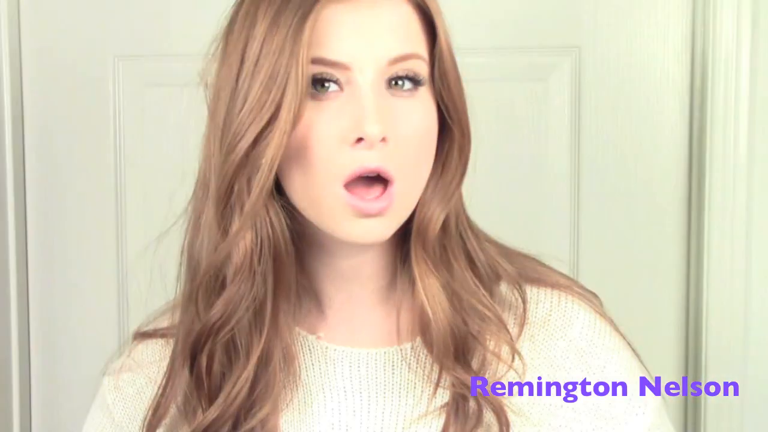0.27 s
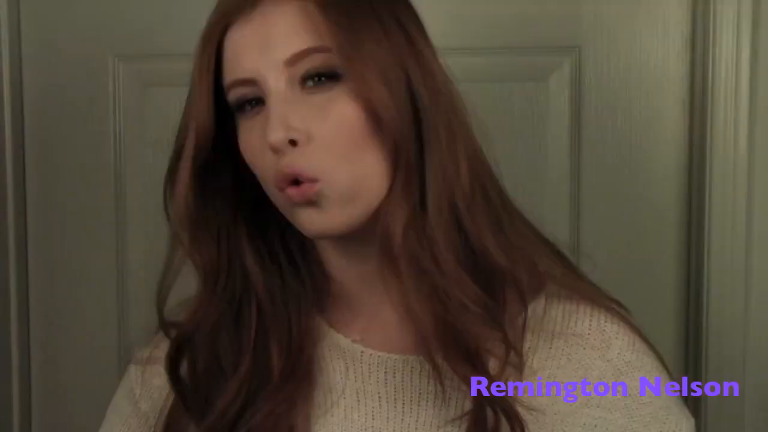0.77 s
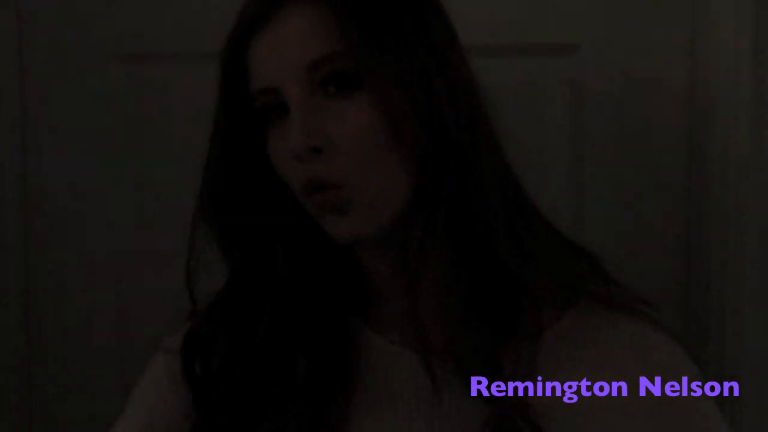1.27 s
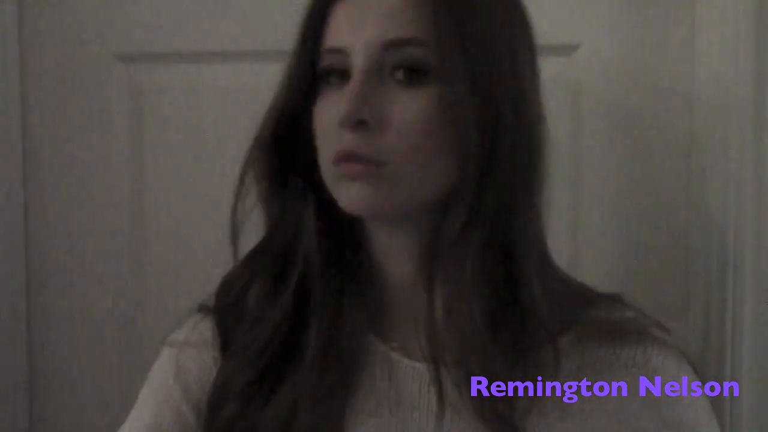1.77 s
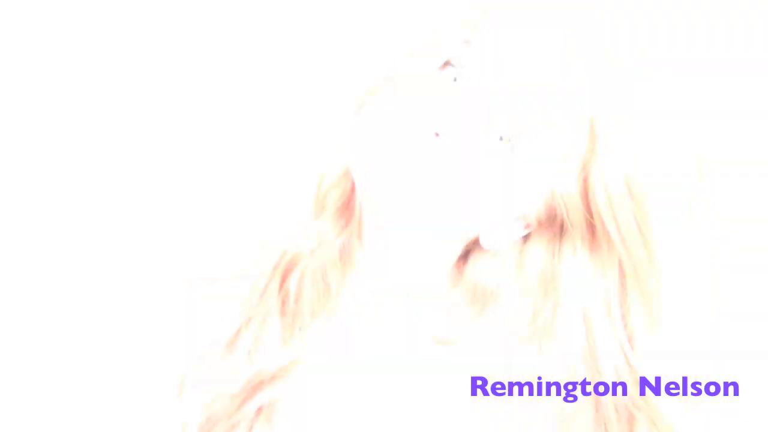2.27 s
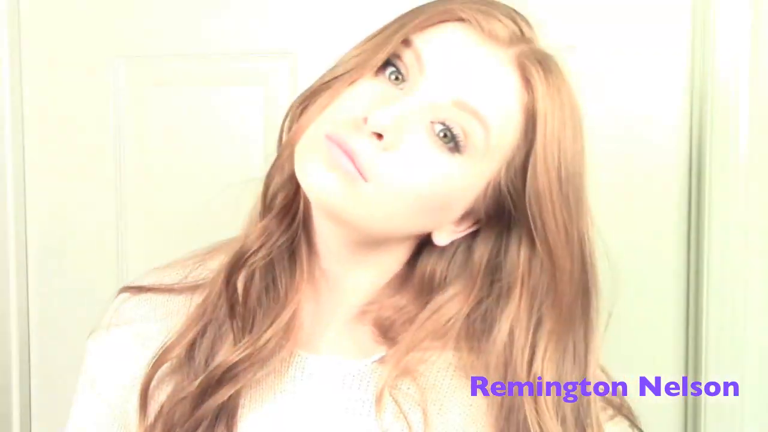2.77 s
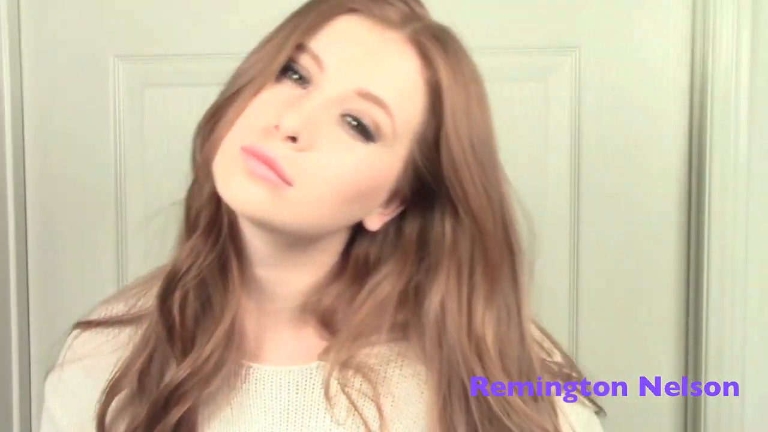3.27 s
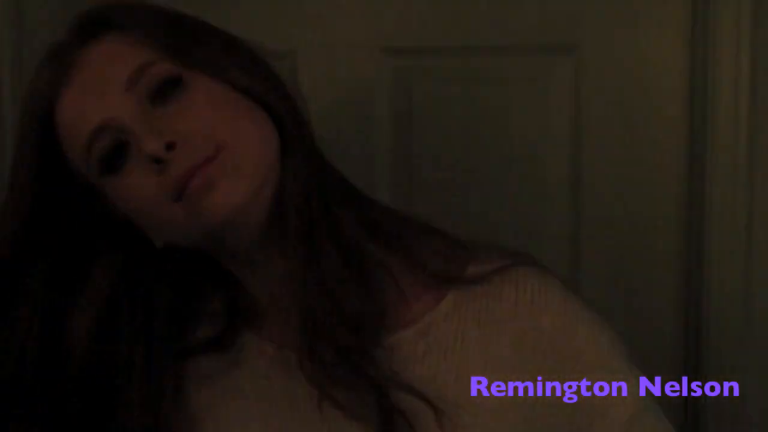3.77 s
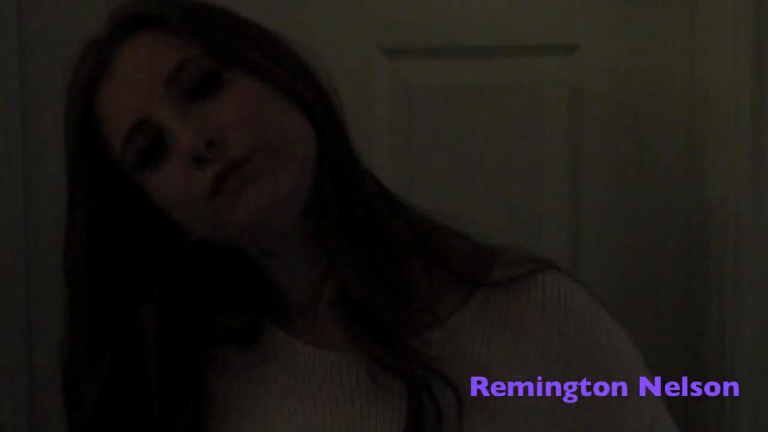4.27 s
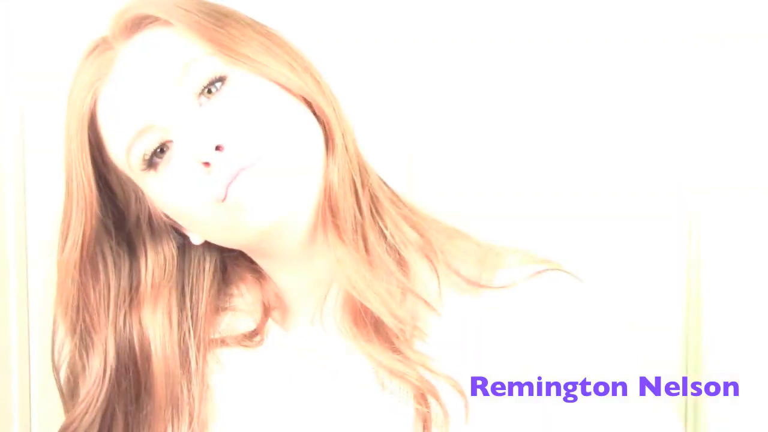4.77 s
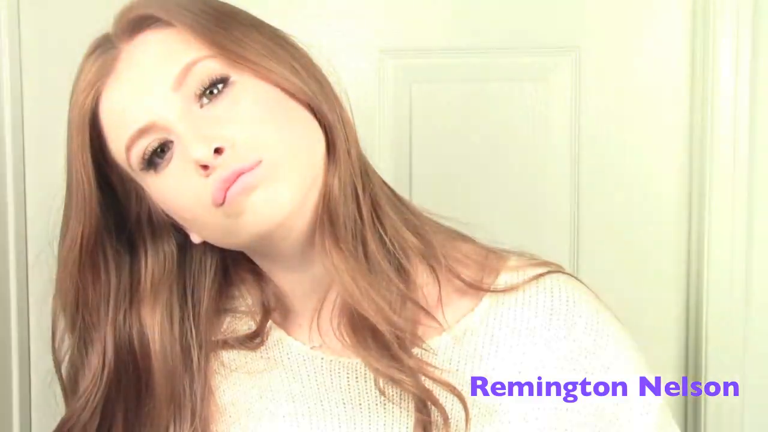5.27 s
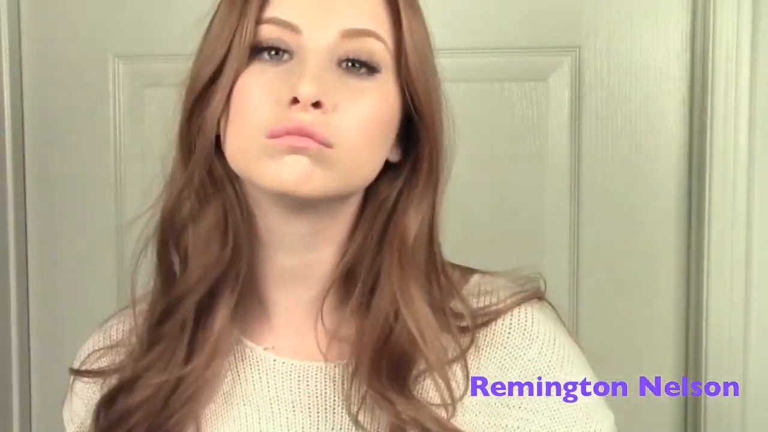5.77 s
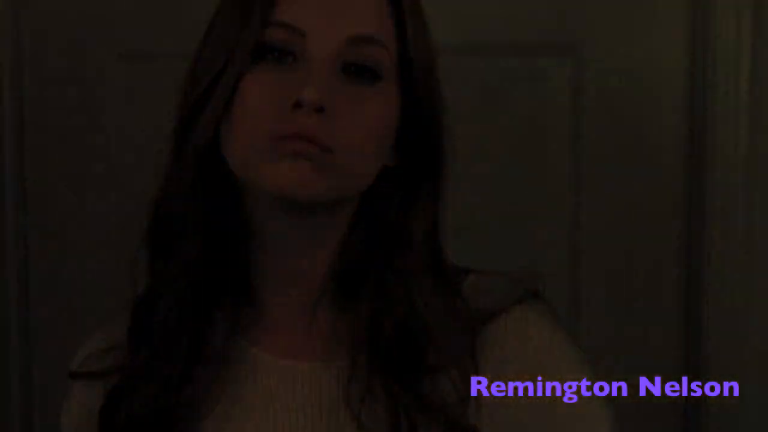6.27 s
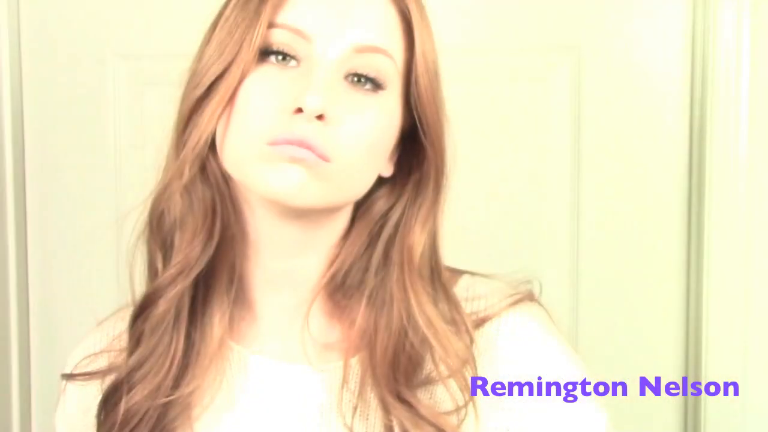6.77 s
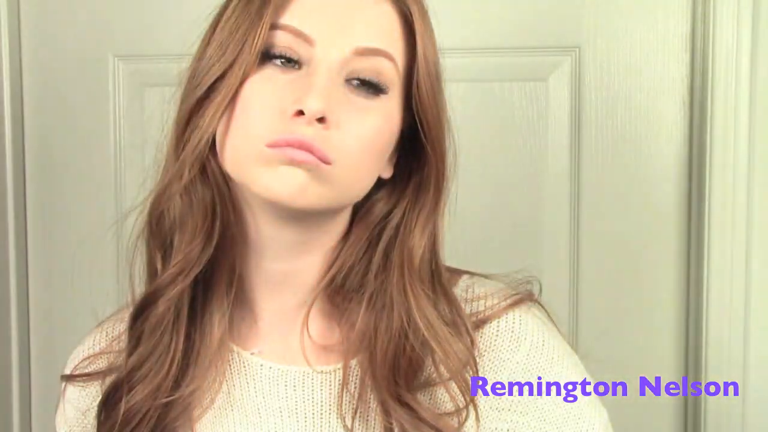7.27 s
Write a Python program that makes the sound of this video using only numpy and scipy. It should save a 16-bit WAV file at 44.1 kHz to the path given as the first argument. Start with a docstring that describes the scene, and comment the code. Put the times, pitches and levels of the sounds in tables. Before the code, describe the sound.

A light switch clicks sharply off and on three times in a small echoing room, over a low ventilation hum.

```python
"""A small, hard-walled room, with a stereo microphone close to a wall switch.
Over ventilation rumble, hum and a rattling fan, the switch is flicked off and on three times.
Each flick is a snap of the contacts, a rebound or two and the lever hitting its stop; the room rings on.
Between flicks come faint ticks and the soft taps of someone shifting about.
A limiter ducks the snaps and lets the echo swell back."""
import sys
import numpy as np
from scipy import signal
from scipy.fft import rfft, irfft, next_fast_len
from scipy.io import wavfile
from scipy.ndimage import uniform_filter1d, minimum_filter1d

SR = 44100
rng = np.random.default_rng(int(sys.argv[2]) if len(sys.argv) > 2 else 0)


def persist_wave(psi):
    """Save psi, clipped to +-1, as 16-bit WAV."""
    counts = np.round(np.clip(psi, -1, 1) * 32767).astype(np.int16)
    wavfile.write(sys.argv[1], SR, np.atleast_2d(counts).T)


N = 331609

# ventilation at the microphone, mid and side: (frequency [Hz], relative level [dB])
VENT_MID = [(12, -42.5), (20, -12), (74, 0), (123, -3), (145, -1.5), (240, -4), (268, -9.5), (355, -10.5),
            (397, -16), (554, -19), (1210, -27), (1690, -26.5), (2800, -30.5), (7230, -36), (15800, -44.5)]
VENT_SIDE = [(12, -42), (20, -1.5), (149, -1), (355, -5.5), (1210, -19), (1690, -18.5), (1950, -23.5),
             (4020, -29), (11000, -37), (14100, -38.5), (15800, -54)]
# tones of the hum: (frequency [Hz], rms level [dB])
HUM_TONES = [(86.5, -60), (120, -51.5), (206, -59), (360, -65.5)]
# colour of the fan's rattle: (frequency [Hz], relative level [dB])
FAN_COLOUR = [(900, -19), (1450, -8.5), (1750, 0), (2200, -14), (3000, -19), (6000, -26)]
# snaps of the contacts, the last three columns relative to the level:
# (time [s], level [dB], brightness [dB/octave], plate thud [dB], spring ring [dB], blade ring [dB])
OFF_SNAPS = [(.8107, 16.5, 1.7, -18.5, -16.5, -25), (3.6040, 22.5, 2.5, -24, -11, -24),
             (6.0574, 15, 2, -35, -16.5, -20)]
ON_SNAPS = [(2.0188, 17.4, 1.2, -12.5, -11, -36), (4.5259, 18.6, -1.16, -16, -10.5, -13),
            (6.5482, 18.7, -0.38, -14, -9, -13.5)]
# the lever hitting its stop: (time [s], level [dB])
OFF_LEVER_STOPS = [(0.8147, 23.5), (3.6376, 17), (6.0681, 21.5)]
ON_LEVER_STOPS = [(2.0417, 12.5), (4.5545, 8.7), (6.5875, 10.5)]
# shared by all flicks one way: (snap rattle [ms], stop rattle [ms], lever ring [dB], stop thud change [dB])
OFF_ACTION = (0.62, 0.77, -26, -12.5)
ON_ACTION = (0.52, 2.2, -17.5, -3.5)
# colour of the plastic housing, each way, and of the wall plate: (frequency [Hz], relative level [dB])
OFF_HOUSING = [(150, -21), (600, -25), (1800, -15), (2400, -9), (3300, -4), (3950, -0.5), (4700, -7.5),
               (5500, -8.5), (6700, 1), (7600, -2), (8800, -10.5), (11000, -16.5), (14500, -21),
               (16500, -50.5)]
ON_HOUSING = [(150, -58), (500, -34.5), (950, -10), (1800, -10), (2500, 7.5), (2900, -2.5), (4200, 2.5),
              (5200, 0.5), (6600, 3.5), (8100, 3), (9600, -5.5), (12000, -5.5), (14500, -10),
              (16500, -47.5)]
WALL_PLATE = [(100, 0.5), (300, -7.5), (520, -13), (700, 4), (940, 1.5), (1200, 7.5), (1500, 9),
              (2000, -0.5), (3000, -10.5), (8000, -50.5)]
# ringing of the spring, contact blade and lever: (frequency [Hz], T60 [s])
PART_RINGS = [(2470, 0.046), (4090, 0.083), (6650, .012)]
# decay of the room's tail: (frequency [Hz], T60 [s])
TAIL_T60 = [(200, 0.67), (800, 0.55), (2000, 0.51), (4000, 0.52), (7000, 0.45), (10000, 0.38),
            (15000, 0.23)]
# colour of that tail: (frequency [Hz], relative level [dB])
TAIL_COLOUR = [(200, -14.5), (800, 1.5), (2000, 1), (4000, 4), (7000, -1.5), (10000, 1), (15000, 4)]
# stereo width at the microphone: (frequency [Hz], side gain [dB])
SIDE_GAIN = [(200, -14), (600, -15), (1400, -35), (2400, -57.5), (4400, -15), (8000, -12), (15000, -12)]
# tiny ticks, and soft taps of someone shifting about: (time [s], level [dB], rattle [ms])
TINY_TICKS = [(1.593, -32, 4.6), (3.080, -31.5, 2.5), (4.100, -30, 5), (4.2259, -27.5, 1.2)]
SOFT_TAPS = [(3.170, -15, 15), (3.190, -20, 26), (3.348, -28.5, 19), (4.058, -23, 35), (4.094, -26.5, 9.2)]
# their colours: (frequency [Hz], relative level [dB])
TICK_SPECTRUM = [(1000, -18), (4500, -10), (5300, 0), (6600, -5), (8000, -11), (9500, -11), (11000, -18),
                 (16000, -21)]
TAP_SPECTRUM = [(300, -6), (800, -18), (1220, 3), (1500, -6), (1950, 4.5), (2600, -9.5), (3300, -3.5),
                (4400, -33.5), (5250, -5), (6000, -26), (7000, -17), (10000, -33.5), (16000, -30)]


def amp(db):
    return 10 ** (np.asarray(db) / 20)


def unit_rms(x):
    return x / np.sqrt(np.mean(x ** 2) + 1e-20)


def unit_energy(x):
    return x / (np.linalg.norm(x) + 1e-12)


def curve_at(points, hz):
    """Joins the points of a spectrum on a log-frequency axis."""
    point_hz, values = np.transpose(points)
    return np.interp(np.log(hz + 1), np.log(point_hz + 1), values)


def add(mix, start_s, sound):
    """Lays a sound into the mix."""
    part = mix[round(start_s * SR):][:len(sound)]
    part += sound[:len(part)]


def shaped(x, points):
    """Equalises a long sound without shifting its phase."""
    size = next_fast_len(N)
    gain = amp(curve_at(points, np.fft.rfftfreq(size, 1 / SR)))
    return irfft(rfft(x, size) * gain, size)[:N]


def coloured(x, points, size=4096):
    """Causal filter with the given spectrum: nothing sounds before the blow."""
    log_gain = np.log(amp(curve_at(points, abs(np.fft.fftfreq(size, 1 / SR)))))
    minimum_phase = np.exp(np.conj(signal.hilbert(log_gain)))
    return signal.fftconvolve(x, np.fft.ifft(minimum_phase).real[:size // 2])


def noise(points):
    """Steady noise of rms one with the given spectrum."""
    return unit_rms(shaped(rng.standard_normal(N), points))


def ventilation(mains_hz=60, shaft_hz=26.7, jolt_s=0.0068, hum_waver_rad=0.26, shaft_waver_rad=0.58):
    """Room tone, mid and side: rumble and hiss of the air, a wavering hum and a fan's faint rattle."""
    t = np.arange(N) / SR
    drift = [(1, 0), (3, -6), (10, -40), (40, -120)]  # (frequency [Hz], relative level [dB])
    hum = sum(amp(db) * np.sqrt(2) * np.sin(2 * np.pi * hz * t + hum_waver_rad * noise(drift))
              for hz, db in HUM_TONES)
    # each mains cycle jolts the motor, but it only rattles during one half of the shaft's turn
    jolts = np.exp(-(t % (1 / mains_hz)) / jolt_s)
    contact = np.maximum(np.sin(2 * np.pi * shaft_hz * t + shaft_waver_rad * noise(drift)), 0)
    fan = amp(-66) * unit_rms(shaped(rng.standard_normal(N) * jolts * contact, FAN_COLOUR))
    return np.array([amp(-45) * noise(VENT_MID) + hum + fan, amp(-53) * noise(VENT_SIDE)])


def flicks(snaps, stops, action, rebounds, gap_s=0.0014, rebound_db=-2.5):
    """Lists the impacts: the contacts snap and rebound, then the lever hits its stop, a little duller."""
    snap_ms, stop_ms, lever_db, stop_thud_db = action
    impacts = []
    for (snap_s, db, tilt, thud_db, spring_db, blade_db), (stop_s, stop_db) in zip(snaps, stops):
        for k in range(rebounds + 1):
            impacts.append((snap_s + k * gap_s, db + k * rebound_db, snap_ms, tilt, thud_db,
                            spring_db, blade_db, lever_db))
        impacts.append((stop_s, stop_db, stop_ms, tilt - 1, thud_db + stop_thud_db,
                        spring_db - 2.5, blade_db, lever_db))
    return impacts


def rattle(decay_ms, size=4096):
    """Surfaces chatter as they meet: a dying burst of force, spread fairly evenly over all pitches."""
    fade = np.exp(-np.arange(size) / SR * 1000 / decay_ms)
    burst = rng.standard_normal(size) * fade
    for _ in range(2):
        whitened = irfft(np.exp(1j * np.angle(rfft(burst))))
        burst = whitened * fade ** 0.25
    return unit_energy(burst)


def switch(impacts, housing, slide_db=-20, slide_s=0.006):
    """After a brief slide of the lever, each impact sounds the housing, wall plate and small parts."""
    out = np.zeros(N)
    t = np.arange(SR // 6) / SR
    rings = [amp(-60 * t / t60) * np.sin(2 * np.pi * hz * t) for hz, t60 in PART_RINGS]
    for hit_s, db, rattle_ms, tilt, thud_db, *ring_dbs in impacts:
        force = rattle(rattle_ms)
        tilted_housing = [(hz, level + tilt * np.log2(hz)) for hz, level in housing]
        add(out, hit_s, amp(db) * unit_energy(coloured(force, tilted_housing)))
        add(out, hit_s, amp(db + thud_db) * unit_energy(coloured(force, WALL_PLATE)))
        for ring, ring_db in zip(rings, ring_dbs):
            add(out, hit_s, amp(db + ring_db) * unit_energy(signal.fftconvolve(force, ring)))
        slide = rng.standard_normal(len(t)) * (t < slide_s) * t ** 2  # the lever gathers speed
        add(out, hit_s - slide_s, amp(db + slide_db) * unit_energy(coloured(slide, housing)))
    return out


def room_tail():
    """Dense reflections between the hard walls, each band dying at its own speed."""
    hz, t, bands = signal.stft(rng.standard_normal(SR), SR, nperseg=256)
    decay = amp(-60 * t / curve_at(TAIL_T60, hz)[:, None])
    tail = signal.istft(bands * decay, SR, nperseg=256)[1][:SR]
    return unit_energy(coloured(tail, TAIL_COLOUR)[:SR])


def room(beams, near_db=-6.5, near_t60_s=0.07, near_gap_s=0.00063, tail_db=-10, tail_rise_s=0.0081):
    """Mid and side: one beam reaches the microphone directly; all return off near walls and as a tail."""
    t = np.arange(SR) / SR
    near_envelope = amp(-60 * t / near_t60_s) * (t > near_gap_s)
    tail_rise = np.minimum(t / tail_rise_s, 1)
    direct = beams[0]
    mid, side = np.zeros((2, N))
    for beam in beams:
        for channel in (mid, side):
            near = unit_energy(rng.standard_normal(SR) * near_envelope)
            response = amp(near_db) * near + amp(tail_db) * room_tail() * tail_rise
            add(channel, 0, signal.oaconvolve(beam, response) / np.sqrt(len(beams)))
    # a slight lag between the microphone's ports puts direct sound into the side, a quarter cycle turned
    turned = -signal.hilbert(direct, next_fast_len(N)).imag[:N]
    return np.array([direct + mid, shaped(side + amp(-2) * turned, SIDE_GAIN)])


def touches(hits, colour):
    """Ticks and taps: surfaces meet lightly, without ringing."""
    out = np.zeros(N)
    for hit_s, db, rattle_ms in hits:
        add(out, hit_s, amp(db) * unit_energy(coloured(rattle(rattle_ms), colour)))
    return out


def stereo(mid_side, balance_db=0):
    """Decodes mid and side to left and right; a negative balance leans right."""
    mid, side = mid_side
    return np.array([(mid + side) * amp(balance_db / 2), (mid - side) * amp(-balance_db / 2)])


def scene():
    """The close switch and the faint touches sound through the room, over the ventilation."""
    faint = touches(SOFT_TAPS, TAP_SPECTRUM) + touches(TINY_TICKS, TICK_SPECTRUM)
    off = flicks(OFF_SNAPS, OFF_LEVER_STOPS, OFF_ACTION, rebounds=2)
    on = flicks(ON_SNAPS, ON_LEVER_STOPS, ON_ACTION, rebounds=1)
    # two beams: the switch radiates a little differently in each direction
    beams = [switch(off, OFF_HOUSING) + switch(on, ON_HOUSING) + faint for _ in range(2)]
    return stereo(room(beams)) + stereo(ventilation(), balance_db=-1.3)


def record(dry, ceiling_db=1.5, release_db_per_s=115, ahead_samples=90, cutoff_hz=15950):
    """The recorder: a look-ahead limiter that drops fast and recovers steadily, soft clip, low-pass."""
    over_db = np.maximum(20 * np.log10(abs(dry).max(0) + 1e-9) - ceiling_db, 0)
    release_db = np.arange(N) / SR * release_db_per_s
    cut_db = np.maximum.accumulate(over_db + release_db) - release_db
    held_gain_db = minimum_filter1d(-cut_db, 2 * ahead_samples)
    limited = dry * amp(uniform_filter1d(held_gain_db, ahead_samples))
    rounded = limited / (1 + limited ** 6) ** (1 / 6)
    lowpass = signal.firwin(255, cutoff_hz, window=("kaiser", 9), fs=SR)
    return signal.oaconvolve(rounded, lowpass[None], "same", axes=1)


dry = scene()
out = record(dry)
persist_wave(out)
```